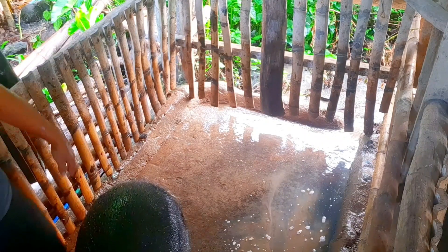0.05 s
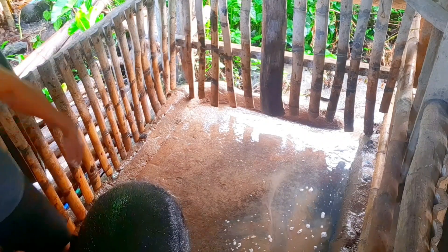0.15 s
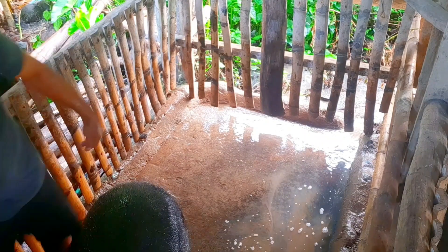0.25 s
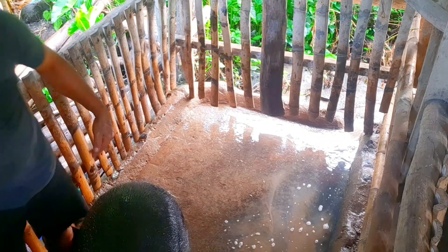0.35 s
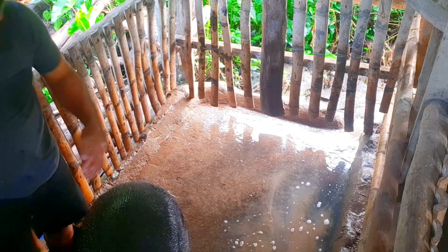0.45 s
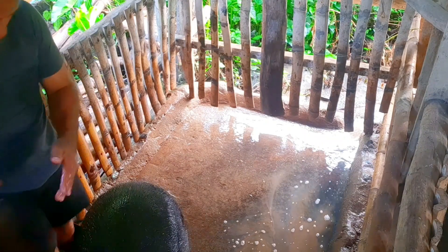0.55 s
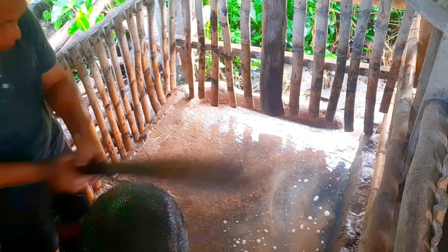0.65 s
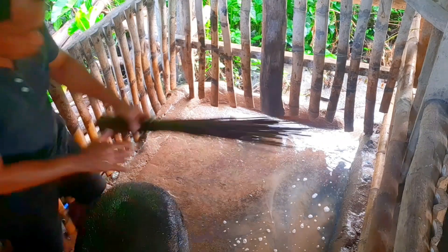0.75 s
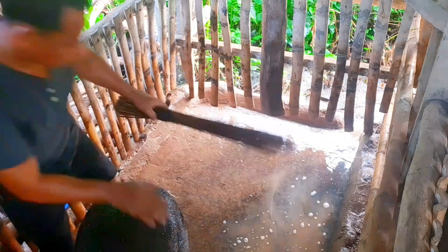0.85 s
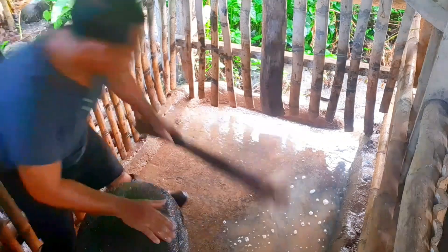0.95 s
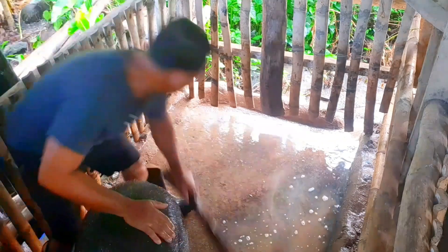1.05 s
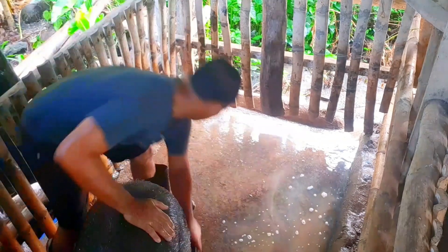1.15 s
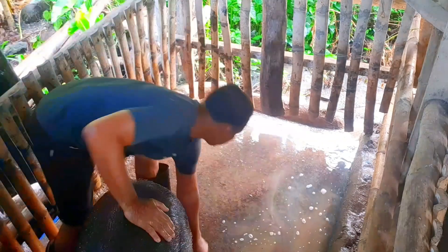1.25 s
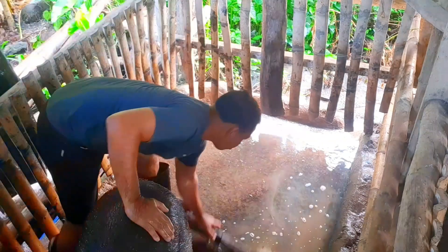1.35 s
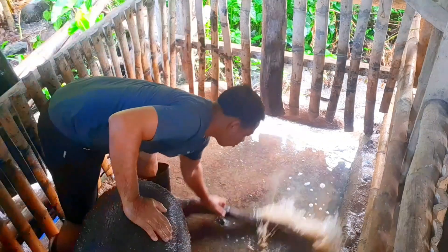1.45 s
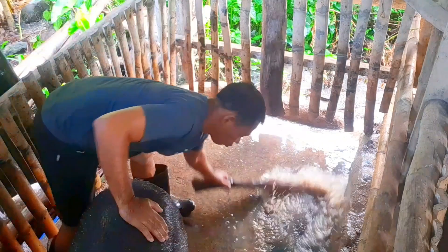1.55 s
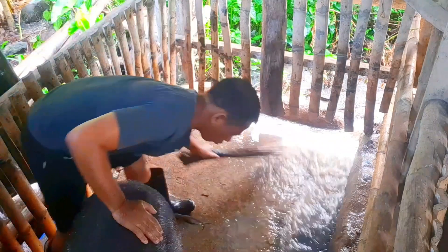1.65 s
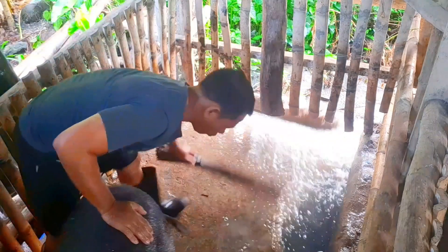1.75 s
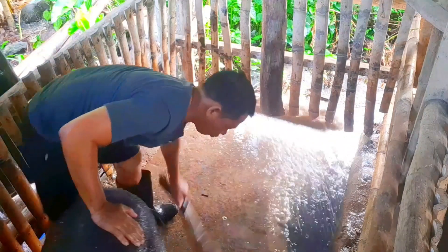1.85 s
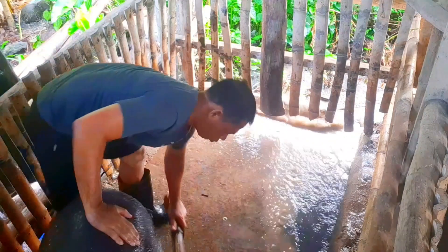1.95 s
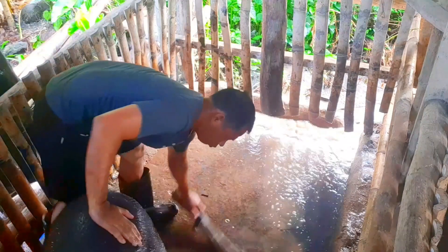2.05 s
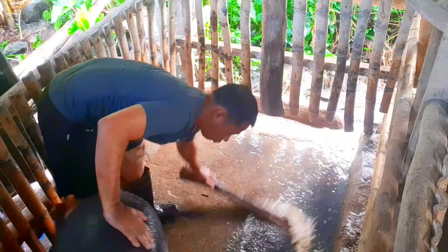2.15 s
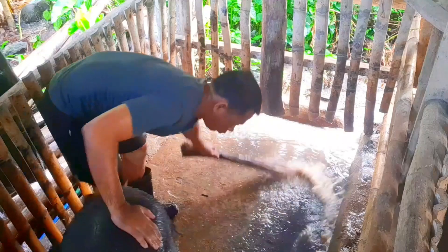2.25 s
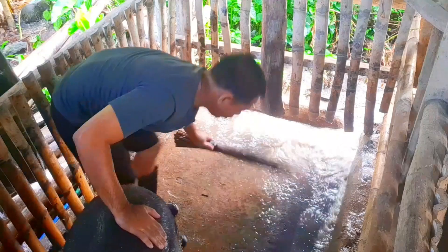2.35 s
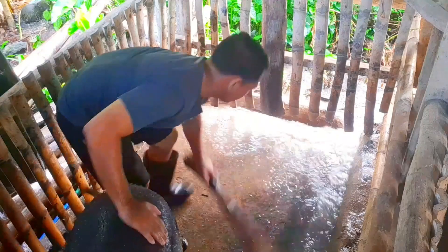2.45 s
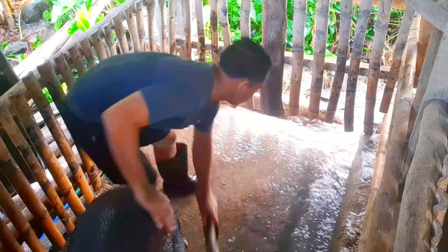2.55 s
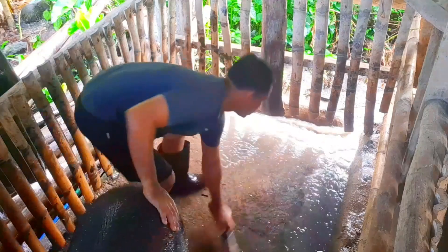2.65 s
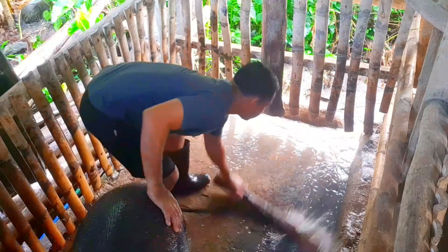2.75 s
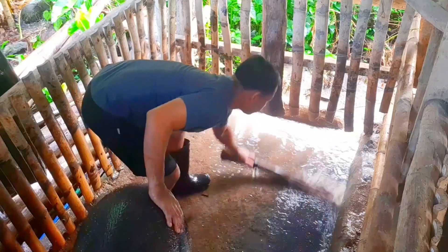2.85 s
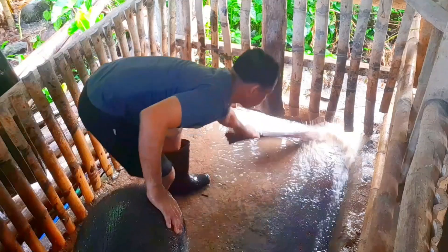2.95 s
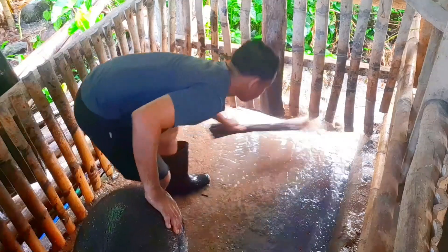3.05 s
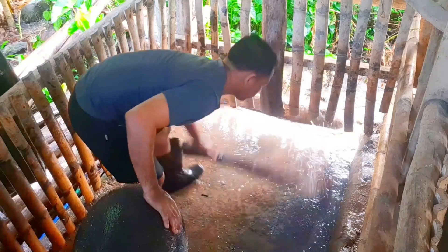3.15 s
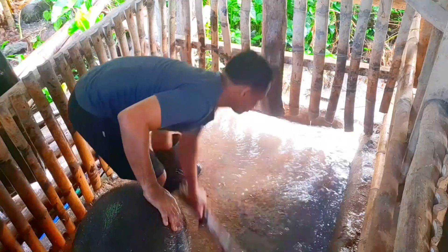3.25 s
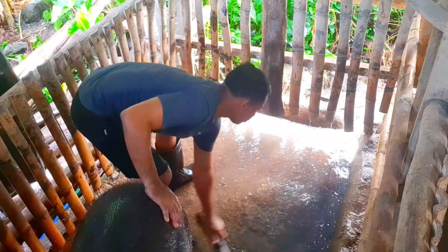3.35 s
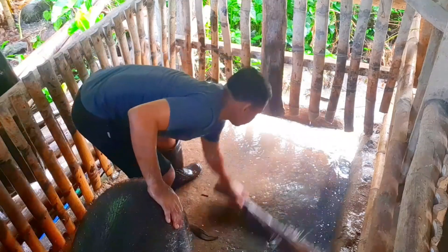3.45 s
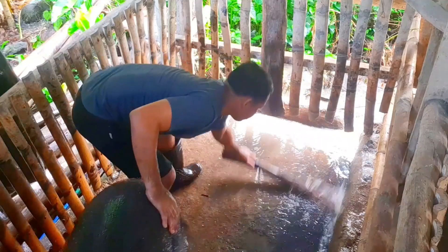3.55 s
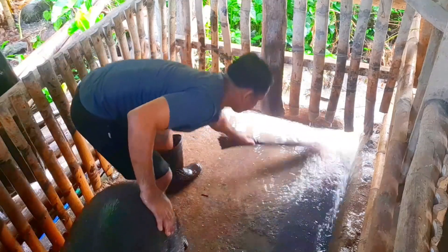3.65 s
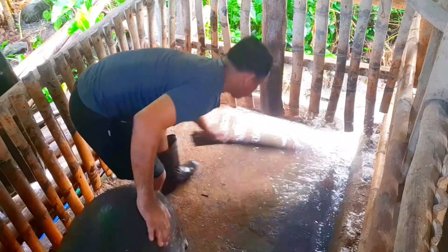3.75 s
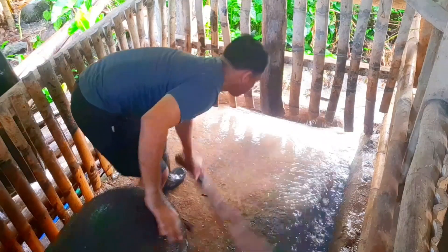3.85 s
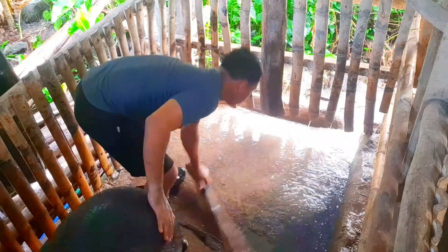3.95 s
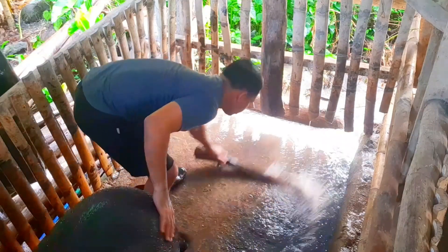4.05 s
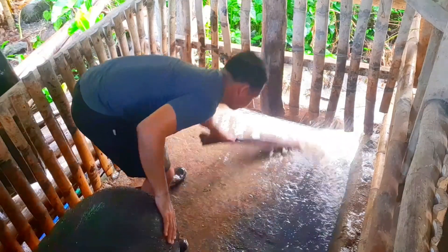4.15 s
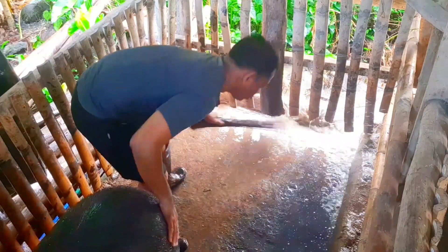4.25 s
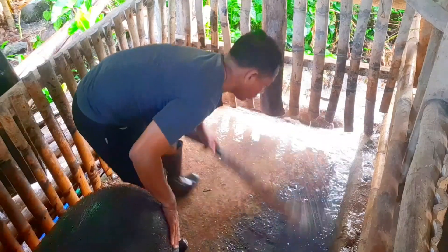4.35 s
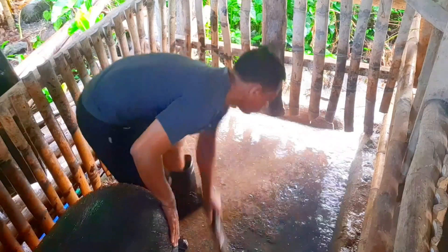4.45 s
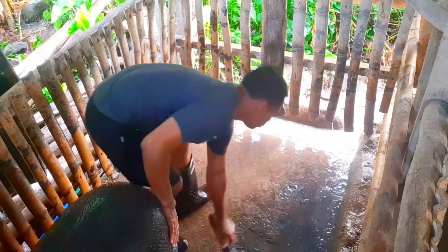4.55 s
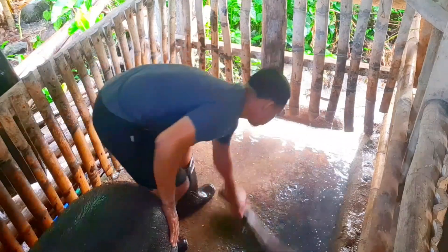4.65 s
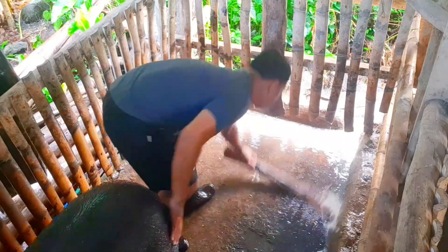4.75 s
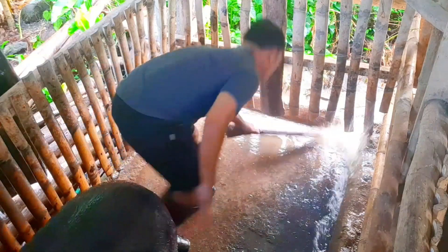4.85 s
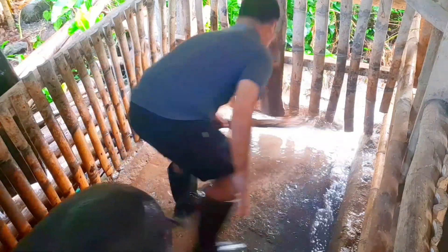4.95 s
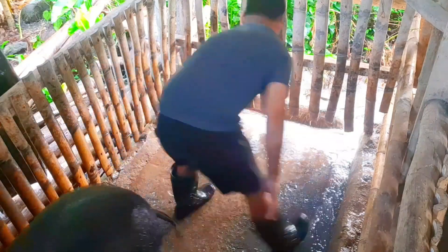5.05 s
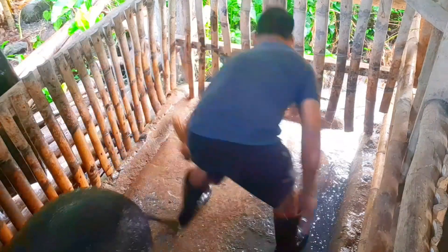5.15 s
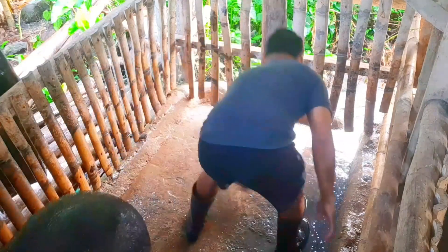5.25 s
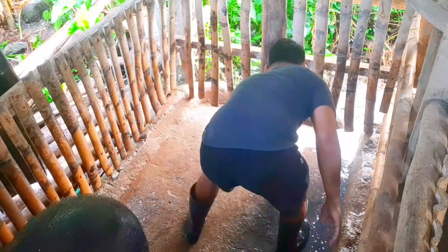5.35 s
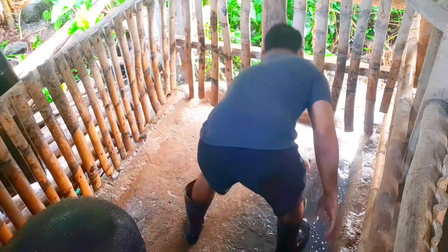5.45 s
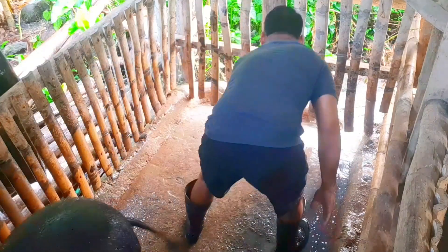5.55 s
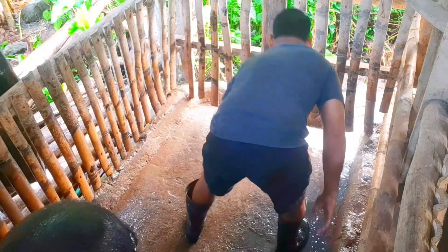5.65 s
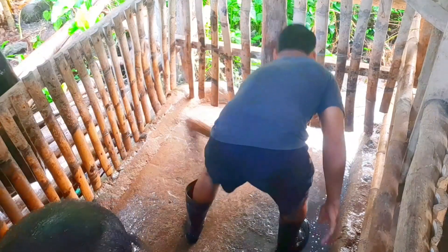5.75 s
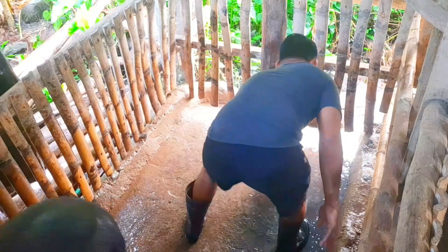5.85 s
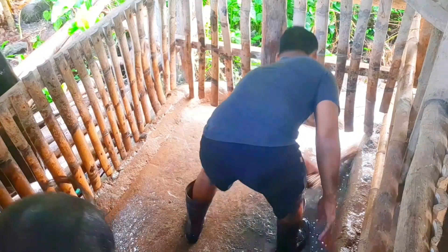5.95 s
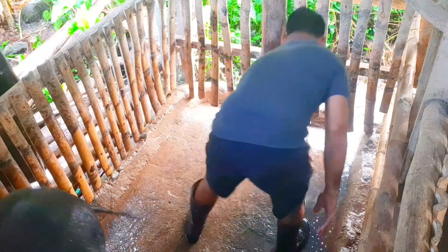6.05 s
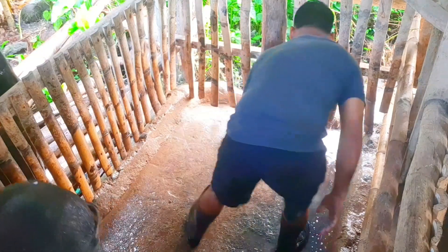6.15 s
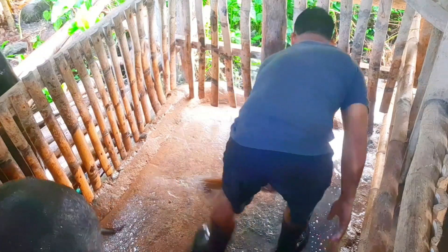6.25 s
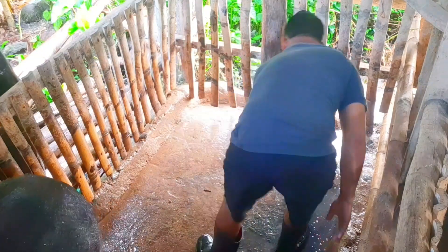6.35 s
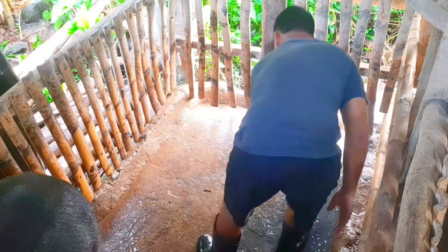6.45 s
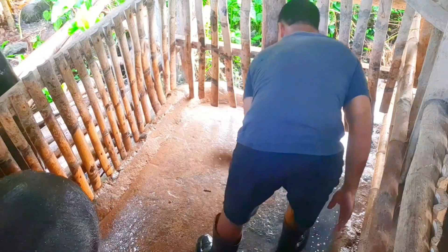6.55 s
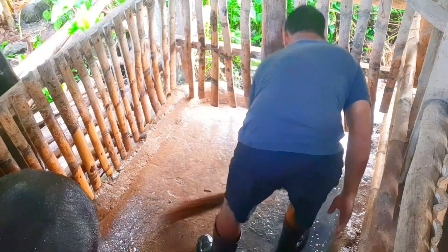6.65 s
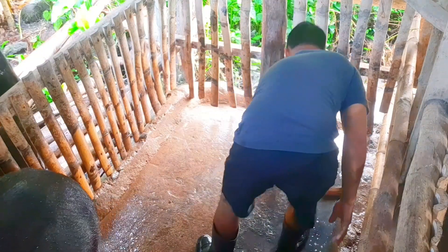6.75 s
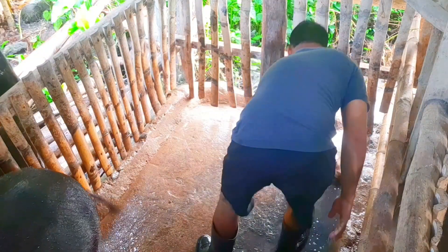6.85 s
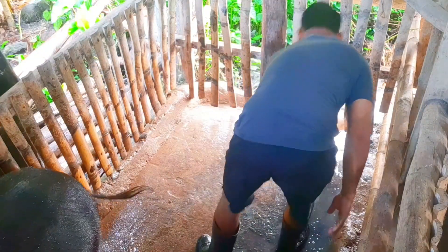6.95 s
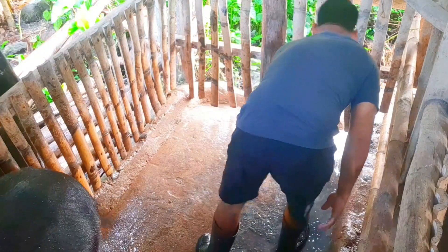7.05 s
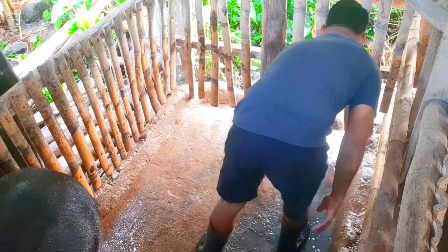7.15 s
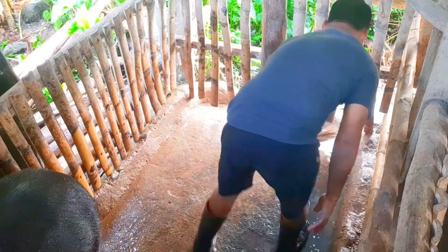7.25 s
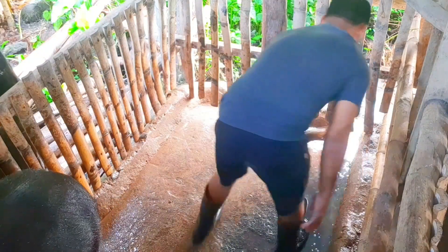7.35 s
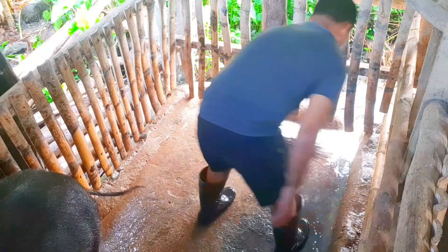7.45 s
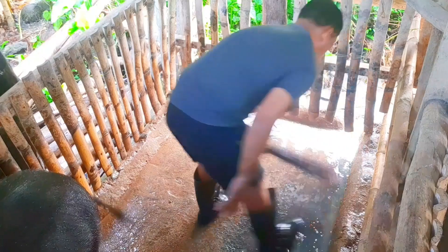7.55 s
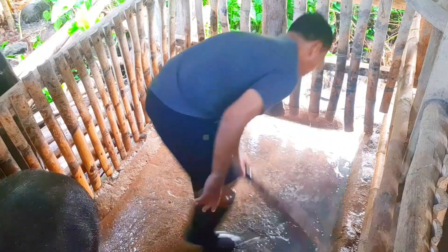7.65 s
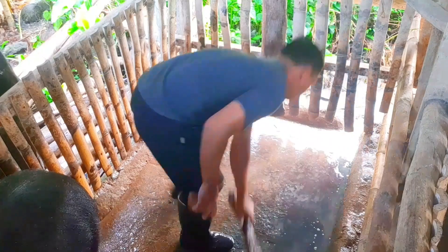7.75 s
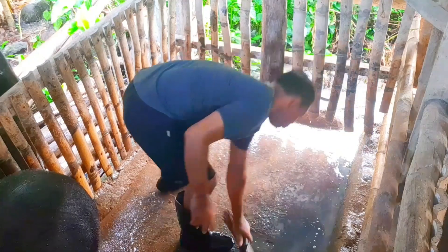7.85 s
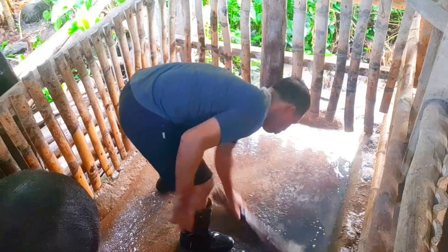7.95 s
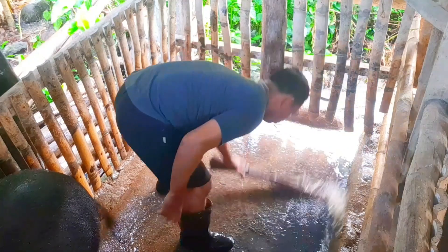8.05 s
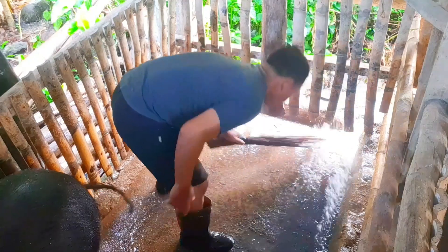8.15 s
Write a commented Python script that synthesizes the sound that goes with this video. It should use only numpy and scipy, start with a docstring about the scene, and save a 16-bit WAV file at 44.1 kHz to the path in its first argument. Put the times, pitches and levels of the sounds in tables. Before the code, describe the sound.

After about a second of faint cloth rustle and a hollow boot clump, a stiff stick broom scrubs wet concrete in separate brisk strokes, each a bright rasp with sizzling tips and splashing water. Short muffled pig grunts and gurgling air pockets come between. Later strokes turn shorter, drier and quieter, then a wetter one ends it. Close stereo microphone in an open slatted pen, broom mostly to the right, with soft hiss, low rumble and a thin insect trill behind.

```python
"""Cloth and soles shuffle and boots clump under a far rumble, an insect's trill and a bird.
Then a stiff stick broom scrubs the wet concrete of a pig pen in twelve strokes: rasp and sizzle are
stick-slip clicks, the splash is torn drops and ringing bubbles, and water runs back after each stroke.
Meanwhile boots ring as damped cavities, air pockets gurgle and the pig grunts in muffled harmonics.
A soft background hiss lies behind it all, its level set by a short table; the pen scatters a short tail."""
import sys
import numpy as np
from scipy import signal
from scipy.fft import rfft, irfft
from scipy.io import wavfile

SR = 44100
rng = np.random.default_rng(int(sys.argv[2]) if len(sys.argv) > 2 else 0)


def to_wav(s):
    """Save 16-bit WAV."""
    ch = np.atleast_2d(s).T  # columns
    pcm = np.round(np.clip(ch, -1, 1) * 32767)  # PCM
    wavfile.write(sys.argv[1], SR, pcm.astype(np.int16))


N = 361619
TIME, FREQ = np.arange(N) / SR, np.fft.rfftfreq(N, 1 / SR)

# strokes of the broom: start_s, bite_s (time to full bite), length_s, growth_db (touch to bite),
# ease_db (easing after the bite, below 0 counts as 0), lift_db_per_s, then relative levels of the parts:
# rasp_db, spray_db, slosh_db (pushed water), sizzle_db (rib tips), run_back_db
BROOM_STROKES = [(1.254, 0.07, 0.37, 10, 11.5, 321, -17.5, -9.5, -27.5, -19, -48.5),
                 (1.973, 0.062, 0.29, 7.5, 7, 289, -17.5, -13, -27.5, -18, -54.5),
                 (2.605, 0.099, 0.36, 25, 6.0, 346, -19, -15.5, -32, -22, -46.5),
                 (3.351, 0.087, 0.27, 16, 1.8, 266, -21.0, -20.5, -33.5, -24.5, -51.5),
                 (3.923, 0.079, 0.24, 26.5, 9.5, 273, -16, -10.5, -39.5, -19, -53.5),
                 (4.559, 0.082, 0.27, 11, 0.0, 239, -22.0, -25.0, -35, -26.0, -54.5),
                 (5.159, 0.15, 0.27, 29, 4.5, 275, -22, -18, -38.0, -25, -62.5),
                 (5.724, 0.101, 0.22, 20.5, 1, 287, -20, -31, -51.5, -21.5, -73),
                 (6.251, 0.1, 0.1, 12.5, -2.5, 257.5, -23.0, -34, -41.5, -17.5, -84),
                 (6.658, 0.056, 0.17, 29, -6, 155, -29, -40.0, -43, -22.5, -61.5),
                 (7.151, 0.052, 0.087, 5, -1.5, 252.5, -30, -39.5, -44.5, -25.5, -74),
                 (7.869, 0.058, 0.21, 8.5, 1.5, 265, -21.5, -20.5, -29, -24.5, -57)]


def amp(db):
    """Decibels to amplitude ratio: 20 dB per factor of ten."""
    return 10 ** (np.asarray(db) / 20)


def unit(x):
    """Normalizes the mean power, so the rms is 1."""
    return x / np.sqrt(np.mean(x ** 2) + 1e-20)


def read(points, hz):
    """Interpolates a table on a logarithmic frequency axis, as pitch is heard."""
    f, value = np.transpose(points)
    return np.interp(np.log(hz + 1), np.log(f + 1), value)


def colour(x, points):
    """Zero-phase filtering: the spectrum is multiplied by a table of hz, gain_db."""
    return irfft(rfft(x) * amp(read(points, FREQ)), N)


def wander(per_s):
    """Low-pass noise of rms 1: a Gaussian roll-off slows the fluctuation to about this rate."""
    slow = rfft(rng.standard_normal(N)) * np.exp(-(FREQ / per_s) ** 2)
    return unit(irfft(slow, N))


def resonate(x, hz, pass_width_hz):
    """Cascaded resonance: two equal passes steepen the skirts."""
    b, a = signal.iirpeak(hz, hz / pass_width_hz, SR)
    return signal.lfilter(b, a, signal.lfilter(b, a, x))


def hollow(hz, pass_width_hz, size):
    """Cavity resonance driven by noise, its envelope evened by a square root."""
    noise = rng.standard_normal(2 * size)
    ring = signal.hilbert(resonate(noise, hz, pass_width_hz))[size:]  # skips the build-up
    return unit(ring.real / np.sqrt(abs(ring) + 1e-12))


def strike(t, rise_s, fade_s):
    """Damped impact envelope: a straight rise, then an exponential fade."""
    return np.minimum(t / rise_s, 1) * np.exp(-np.maximum(t - rise_s, 0) / fade_s)


def clicks(per_s, spread_db):
    """Random impulse train of rms 1: exponentially spread decibels make a few clicks much larger."""
    size = amp(spread_db * np.minimum(rng.exponential(1, N), 4))
    sign = rng.choice([-1, 1], N)
    return unit(size * sign * (rng.random(N) < per_s / SR))


def bubbles(per_s, cycles, count=28):
    """Bubble resonance: many small bubbles, each a short damped ring that rises in pitch."""
    out = np.zeros(N)
    for hz in np.geomspace(430, 4200, count):
        turns = np.arange(int(3 * cycles * SR / hz)) * hz / SR
        rising = turns * (1 + 0.024 * turns / cycles)
        ring = np.sin(2 * np.pi * rising) * np.exp(-2 * turns / cycles)
        births = clicks(per_s / count * hz / 1500, 1.8)  # more small, high bubbles than large ones
        out += np.sqrt(hz) * unit(signal.oaconvolve(births, ring)[:N])
    return unit(out)


def add(mix, s, sound):
    """Superposition: sums a sound into the mix from time s."""
    part = mix[max(round(s * SR), 0):][:len(sound)]
    part += sound[:len(part)]


def pan(x, left_minus_right_db):
    """Places a sound by its level difference between the microphones."""
    return x * amp([[left_minus_right_db / 2], [-left_minus_right_db / 2]])


def pair(a, b):
    """Frequency-dependent coherence: two unrelated sounds become a stereo pair, alike in the bass."""
    # left-right likeness: hz, coherence (0-1)
    likeness = [(60, 0.83), (300, 1), (700, 0.55), (1400, 0.54), (3000, 0.083), (15000, 0.1)]
    same = np.clip(read(likeness, FREQ), 0, 1)
    left = same * rfft(a) + np.sqrt(1 - same ** 2) * rfft(b)
    return np.array([irfft(left, N), a])


def in_pen(a, b, spectrum, band_hz, left_lag_ms=0.15):
    """Level and delay differences set coloured grains mostly to the right; their main band has rms 1."""
    # level difference at the microphones: hz, left_minus_right_db
    broom_side = [(200, 0), (700, 3), (1300, -2), (2400, -8), (4400, -8.5), (6400, -14), (8200, -5.5),
                  (9800, -2.5), (11000, 3.5), (12200, -15), (15500, -15)]
    side_db = read(broom_side, FREQ)
    sides = amp([side_db / 2, -side_db / 2]) / np.sqrt(amp(side_db) + amp(-side_db))
    z = rfft(pair(a, b)) * amp(read(spectrum, FREQ)) * sides
    z[0] *= np.exp(-2j * np.pi * FREQ * left_lag_ms / 1000)
    inside = (FREQ > band_hz[0]) & (FREQ < band_hz[1])
    return irfft(z, N) / np.std(irfft(z.mean(0) * inside, N))


def bird(pass_width_hz=220):
    """Narrow-band noise: faint, blurred whistles from the trees."""
    # whistles of a far bird: start_s, length_s, pitch_hz, level_db (before panning)
    chirps = [(.815, .05, 2110, -65), (1.12, .08, 4850, -97.5)]
    out = np.zeros(N)
    for s, length_s, hz, db in chirps:
        n = int(length_s * SR)
        add(out, s, amp(db) * signal.windows.tukey(n, .7) * hollow(hz, pass_width_hz, n))
    return pan(out, -11)


def outdoors(rumble_trim_db=1):
    """Filtered noise gives a far rumble and a soft hiss; amplitude modulation makes the insect trill."""
    # levels over time of the rumble and of the background hiss: time_s, level_db (before trim and panning)
    rumble_levels, hiss_levels = [(0, -48), (1.1, -48.5), (2.1, -49), (2.9, -56.5), (5.53, -56),
                                  (5.82, -41.5), (6.02, -57), (7.31, -57), (7.88, -48.5), (8.2, -50.5)], [(0, -59.5), (1.2, -59), (6, -58.5), (6.6, -75),
                                                        (7.55, -67), (8.2, -54.5)]
    # their spectra: hz, gain_db
    rumble_spectrum, hiss_spectrum = [(20, -25.5), (45, -18), (65, -5.5), (84, 1), (105, -9.5), (130, -7.5),
                                      (170, -23), (350, -20.5), (700, -35), (2000, -51.5)], [(200, 3), (700, -2), (1500, -20), (2100, -3.5),
                                                      (4500, -10), (6300, -5.5), (7700, -27.5), (8500, -30),
                                                      (9800, -2.5), (11000, -25), (12700, -24), (14000, 0),
                                                      (16000, 1.5)]
    rumble_level_db = np.interp(TIME, *np.transpose(rumble_levels)) + rumble_trim_db
    rumble = unit(colour(pair(*rng.standard_normal((2, N))), rumble_spectrum)) * amp(rumble_level_db)
    hiss_level_db = np.interp(TIME, *np.transpose(hiss_levels))
    hiss = unit(colour(pair(*rng.standard_normal((2, N))), hiss_spectrum)) * amp(hiss_level_db)
    trill_per_s = 13 * (1 + 0.22 * wander(9.5))
    trill = 1 + .35 * np.sin(2 * np.pi * np.cumsum(trill_per_s) / SR)
    note = resonate(rng.standard_normal((2, N)), hz=7006, pass_width_hz=320)
    insect = amp(-64.5) * unit(trill * note)
    return pan(rumble, 6.3) + pan(hiss, -11.5) + pan(insect, -17.0) + bird()


def shuffle(flutter_db=3.5):
    """Friction noise: cloth and soles rub faintly, mostly before the work starts."""
    # rubs of clothes and feet: start_s, length_s, level_db (before the flutter)
    rubs = [(0, 0.37, -52), (0.273, .2, -60), (0.528, 0.18, -57.5), (0.748, 0.5, -62), (1.117, 0.35, -63)]
    # spectrum of the rubbing: hz, gain_db
    cloth_spectrum = [(120, -18), (350, 3.5), (600, -5.5), (1000, -7), (1500, -14.5), (2100, -11),
                      (4500, -20.5), (6500, -8), (9000, -41)]
    level = np.zeros(N)
    for s, length_s, db in rubs:
        add(level, s, amp(db) * signal.windows.cosine(int(length_s * SR)))
    rubbing = in_pen(clicks(2000, 2.9), clicks(2000, 2.9), cloth_spectrum, (250, 3000))
    return level * amp(flutter_db * wander(21)) * rubbing


def pen(x, size=22000, count=1000):
    """Scattering: fence slats and roof return a short decaying tail, different at each microphone."""
    # reverberation time: hz, t60_s
    pen_t60 = [(150, 0.3), (1000, 0.16), (5000, 0.09), (15000, 0.2)]
    taps, t = np.zeros((2, size)), np.arange(size) / SR
    places, signs = rng.integers(0, size, (2, count)), rng.choice([-1., 1.], (2, count))
    np.put_along_axis(taps, places, signs, 1)
    hz, when_s, z = signal.stft(taps * (t > .004), SR, nperseg=256)
    decay = amp(-60 * when_s / read(pen_t60, hz)[:, None])
    tail = signal.istft(z * decay, SR, nperseg=256)[1]
    return signal.fftconvolve(x, tail / np.linalg.norm(tail[0]), axes=1)[:, :N]


def pig(jitter=0.035, count=4):
    """Harmonic source and low-pass filter: short closed-mouth grunts, unsteady and muffled by the snout."""
    # grunts: start_s, length_s, first_pitch_hz, last_pitch_hz, level_db (before roughness and panning),
    # fall_db per harmonic, roughness (0-1)
    grunts = [(1.791, 0.059, 243, 201, -37, -2, 0.4), (1.821, 0.11, 215.3, 206.6, -31, 7.5, 0.26),
              (2.534, 0.076, 210, 193, -43.5, 2.5, 0.44), (3.465, 0.074, 462, 560, -30, 27, 0),
              (5.473, 0.25, 112.3, 103.3, -47, 31, 0), (7.658, 0.058, 338, 331, -34.5, 15, 0.3)]
    out, shake = np.zeros(N), wander(120)
    for s, length_s, first_hz, last_hz, db, fall_db, rough in grunts:
        n = int(length_s * SR)
        hz = np.linspace(first_hz, last_hz, n) * (1 + jitter * rough * shake[int(s * SR):][:n])
        turns = np.cumsum(hz) / SR
        voice = np.zeros(n)
        for k in range(1, count + 1):
            muffling = 1 + (k * first_hz / 580) ** 6
            voice += amp(-fall_db * k) / muffling * np.sin(2 * np.pi * k * turns)
        grunt = unit(voice) + rough * hollow(410, 330, n)
        add(out, s, amp(db) * signal.windows.tukey(n, .6) * grunt)
    return out


def boots(width_share=0.46, clean_share=.6, size=16384):
    """Damped cavity resonance: the hollow rubber boot rings, with a wet smack and the sole's low thud."""
    # boots on the wet floor: start_s, level_db (before panning), hollow_pitch_hz, fade_s,
    # smack_db and thud_db (re the level)
    steps = [(0.552, -49, 443, 0.028, -9, -12), (0.988, -23.5, 474, 0.0069, -9, -15.5),
             (1.048, -50, 464, .016, -15, -15), (1.215, -42.5, 349.4, 0.031, -21, -12),
             (2.41, -42.5, 420, .015, -16, -20), (3.633, -30, 418, 0.0063, 1, -23),
             (3.797, -41.5, 299, 0.024, -13, -13), (3.832, -42.5, 480, 0.041, -22, -15),
             (4.44, -43, 293, 0.02, -14, -28), (5.085, -43, 467, 0.029, -5, -4.5),
             (5.672, -29, 503, 0.043, -3.5, -6), (6.15, -59, 460, 0.12, -1, -12.5),
             (6.203, -43, 416, 0.061, -5.5, -8), (6.255, -39, 341, 0.028, -9, -19.5),
             (7.669, -42, 560, 0.015, -10, -6), (7.732, -46, 348, .016, -9, -10),
             (7.786, -34, 186, 0.013, -20, -11), (7.811, -33.5, 416, .012, -9.5, -26)]
    # spectrum of the wet smack: hz, gain_db
    smack_spectrum = [(150, -19.5), (500, -7.5), (1000, 5), (1350, -10.5), (2000, -4.5), (2500, -18),
                      (3200, -6), (4500, -17.5), (6500, -10.5), (8500, -39), (15000, -34)]
    out, t = np.zeros(N), np.arange(size) / SR
    smack = unit(colour(clicks(5000, 2.2), smack_spectrum))
    for k, (s, db, hz, fade_s, smack_db, thud_db) in enumerate(steps):
        clean = clean_share * np.exp(-t / 0.056)  # the note blurs as the sole settles
        note = np.sqrt(2 * clean) * np.sin(2 * np.pi * hz * t)
        blur = np.sqrt(1 - clean) * hollow(hz, width_share * hz, size)
        wet = amp(smack_db) * np.roll(smack, k * size)[:size]
        rise_s = .003 + .2 * fade_s  # a softer step also lands more slowly
        add(out, s, amp(db) * strike(t, rise_s, fade_s) * (note + blur + wet))
        # the sole settles after the heel and rings below the hollow of the boot
        thud = strike(t, 0.036, 0.025) * hollow(.47 * hz, 100, size)
        add(out, s, amp(db + thud_db) * thud)
    return out


def gurgles(pass_width_hz=130, rise_s=0.01, size=16384):
    """Volume resonance of trapped air: pockets ring in the stirred water and die away."""
    # air pockets: start_s, level_db (before panning), pitch_hz, fade_s
    pockets = [(1.36, -26.5, 760, 0.054), (1.4, -29, 458, 0.061), (1.485, -30.5, 520, .04),
               (2.875, -26.5, 740, 0.043), (2.945, -25.5, 767, 0.02), (3.03, -35.5, 677, 0.018),
               (3.15, -42, 670, 0.045), (3.55, -46, 1025, 0.032), (5.686, -19.5, 896, 0.016)]
    out, t = np.zeros(N), np.arange(size) / SR
    for s, db, hz, fade_s in pockets:
        envelope = np.minimum(t / rise_s, 1) * np.exp(-t / fade_s)
        add(out, s, amp(db) * envelope * hollow(hz, pass_width_hz, size))
    return out


def trickle(bubble_db=-2, flutter_db=3.5, drain_db_per_s=27):
    """Drop impacts and bubble resonance: drops patter back, and the closing film of water bubbles."""
    # spectrum of the water running back: hz, gain_db
    trickle_spectrum = [(200, -10), (600, -1), (1000, -3.5), (2000, -3), (3300, -3), (5000, -4), (7000, -4),
                        (8500, -25.5), (12000, -11.5), (15000, -6)]
    level, t = np.zeros(N), np.arange(2 * SR) / SR
    for s, _, length_s, *_, db in BROOM_STROKES:
        swell = np.minimum(t / length_s, 1) ** 2
        add(level, s, swell * amp(db - drain_db_per_s * np.maximum(t - length_s, 0)))
    drips = [amp(bubble_db) * bubbles(600, 24) + clicks(5400, 2.8) for _ in range(2)]
    water = in_pen(*drips, trickle_spectrum, (500, 7000))
    return level * amp(flutter_db * wander(25)) * water


def stroke(t, bite_s, length_s, growth_db, ease_db, lift_db_per_s, rasp_db, spray_db, slosh_db, sizzle_db):
    """Contact force sets the gains of rasp, spray, slosh and sizzle: ribs touch, bite, splay and lift."""
    touch_s, ease_s = 0.02, 0.04  # the ribs meet the floor; they splay after the bite
    fine_ease = 1.48  # tips and spray ease this many times as much as the rasp
    loose = np.maximum(1 - t / bite_s, 0)
    # the spray trails the bite by a share of the stroke and starts further down than the rasp
    unstirred = np.maximum(1 - t / (bite_s + 0.13 * length_s), 0)
    spray_growth_db = growth_db + 31
    tips_growth_db = 0.66 * growth_db  # the tips touch first
    eased_db = max(ease_db, 0) * (1 - np.exp(-np.maximum(t - bite_s, 0) / ease_s))
    # the pushed water crests late in the stroke; the slope is in dB per stroke length
    off_crest = abs(np.minimum(t / length_s, 1) - .756)
    levels_db = np.array([rasp_db - growth_db * loose - eased_db,
                          spray_db - spray_growth_db * unstirred - fine_ease * eased_db,
                          slosh_db - 22.5 * off_crest,
                          sizzle_db - tips_growth_db * loose - fine_ease * eased_db])
    lifted_db = lift_db_per_s * np.maximum(t - length_s, 0)
    return np.minimum(t / touch_s, 1) * amp(levels_db - lifted_db)


def broom(rasp_db=0.3, spray_db=0.0, slosh_db=-0.5, sizzle_db=0.75,
          chatter_db=1, spatter_db=0.96, surge_db=2.5, bubble_db=0):
    """Stick-slip friction: ribs catch and slip on grit, tips flick, water tears into drops and bubbles."""
    # the broom is picked up, shifted or lightly dragged: start_s, sizzle_db (relative level),
    # rise_s, fade_s, rasp_db (re the sizzle)
    rustles = [(0.128, -46, .004, 0.053, -12), (1.228, -39, 0.023, 0.027, -6), (1.82, -51, 0.098, .03, 3),
               (1.931, -35.5, 0.025, .022, -6.5), (2.99, -47.5, .055, 0.051, 1),
               (3.055, -32.5, 0.027, 0.02, -12), (5.669, -37, 0.012, 0.08, -8),
               (6.922, -40, 0.064, 0.039, -4.5), (7.672, -62.5, .006, 0.1, 4)]
    # spectra of the ribs and their tips: hz, gain_db
    rasp_spectrum, sizzle_spectrum = [(150, -40), (400, -20.5), (900, -13.5), (1800, -5.5), (3200, 1.5),
                                      (4600, -0.5), (5700, 2.5), (6700, -0.5), (7500, -8), (8500, -20.5),
                                      (10000, -16.5), (12000, -20.5), (16000, -19)], [(2000, -38.5), (6500, -9), (8500, -22), (9700, -16),
                                                    (11800, -13.5), (13000, -6), (14300, -1), (15700, 0),
                                                    (16200, -2.5)]
    # spectra of the torn and the pushed water: hz, gain_db
    spray_spectrum, slosh_spectrum = [(300, -35), (800, -15.5), (1250, -8), (1500, -1.5), (1800, 2),
                                      (2400, -1), (3200, 2), (4300, -6), (7000, -24), (16000, -41.5)], [(150, -42), (300, -19.5), (470, -7), (620, -7.5),
                                                     (800, -0.5), (1020, 3), (1300, -7.5), (2000, 3),
                                                     (4000, -30), (16000, -57)]
    press, thrown, pushed, tips = np.zeros((4, N))
    t = np.arange(SR) / SR
    for s, *gesture, _ in BROOM_STROKES:
        for control, gain in zip((press, thrown, pushed, tips), stroke(t, *gesture)):
            add(control, s, gain)
    for s, db, rise_s, fade_s, ribs_db in rustles:
        flick = amp(db) * strike(t, rise_s, fade_s)
        add(tips, s, flick)
        add(thrown, s, amp(ribs_db - 1.5) * flick)  # the wet ribs shed drops when shifted
        add(press, s, amp(ribs_db) * flick)
    # every slip of a rib is a click, every torn drop a click or a ringing bubble
    grit = [clicks(12000, 2.0) for _ in range(2)]
    flicks = [clicks(9000, 2.06) for _ in range(2)]
    splash = [clicks(5000, 2.6) + amp(bubble_db) * bubbles(1800, 18.7) for _ in range(2)]
    rasp = in_pen(*grit, rasp_spectrum, (3800, 7000))
    sizzle = in_pen(*flicks, sizzle_spectrum, (12000, 16000))
    spray = in_pen(*splash, spray_spectrum, (1300, 3000))
    slosh = in_pen(*np.roll(splash, SR, axis=1), slosh_spectrum, (550, 1100))
    ribs = amp(rasp_db) * press * rasp + amp(sizzle_db) * tips * sizzle
    drops = amp(spray_db + spatter_db * wander(65)) * thrown * spray
    wave = amp(slosh_db + surge_db * wander(45)) * pushed * slosh
    return amp(chatter_db * wander(70)) * ribs + drops + wave  # the bundle chatters as a whole


def scene(broom_room_db=-15, low_room_db=-11):
    """Superposition of direct sound, the pen's scattered tail and the background behind."""
    sweep = broom() + trickle()
    low = pan(boots() + gurgles() + pig(), 3.0)
    room = pen(amp(broom_room_db) * sweep + amp(low_room_db) * low)
    return sweep + low + room + shuffle() + outdoors()


def record(dry, edge_hz=15900):
    """Amplitude limiting clips any peak beyond full scale; a linear-phase low-pass then limits the band."""
    low_pass = signal.firwin(511, edge_hz, window=("kaiser", 9), fs=SR)
    return signal.oaconvolve(np.clip(dry, -1, 1), low_pass[None], "same")


dry = scene()
out = record(dry)
to_wav(out)
```